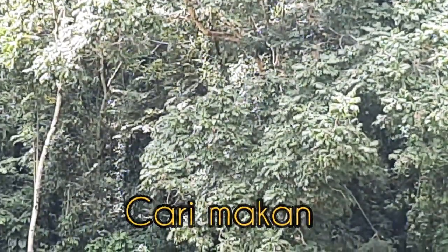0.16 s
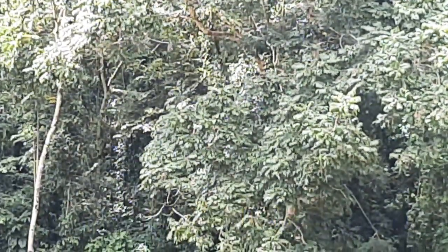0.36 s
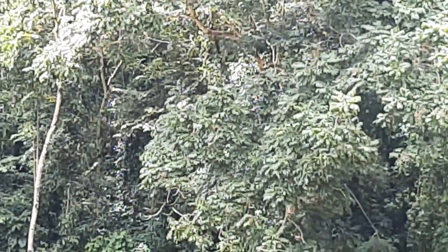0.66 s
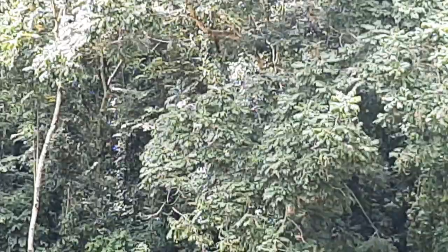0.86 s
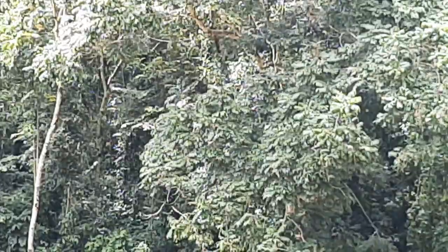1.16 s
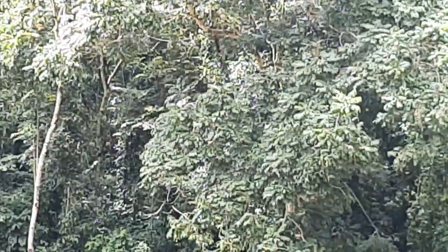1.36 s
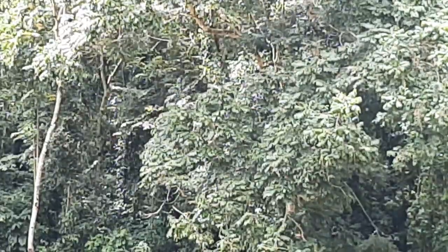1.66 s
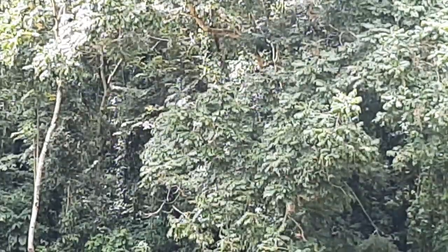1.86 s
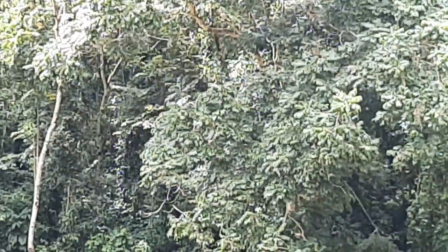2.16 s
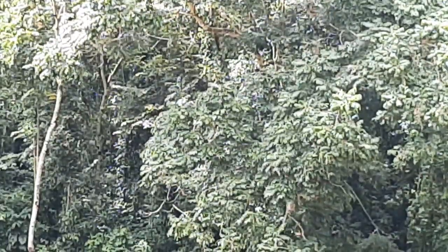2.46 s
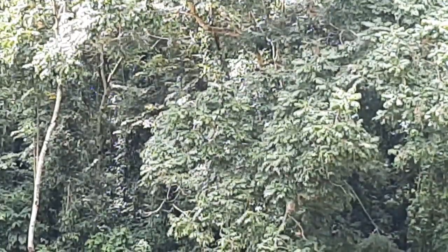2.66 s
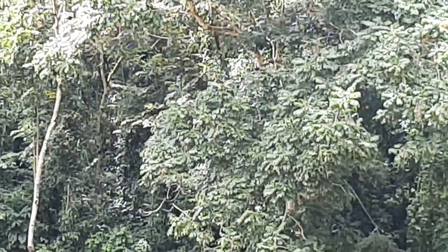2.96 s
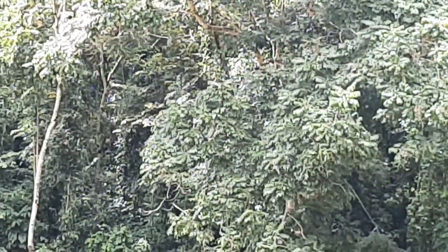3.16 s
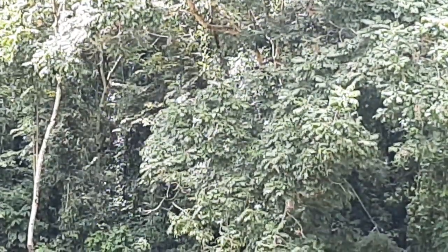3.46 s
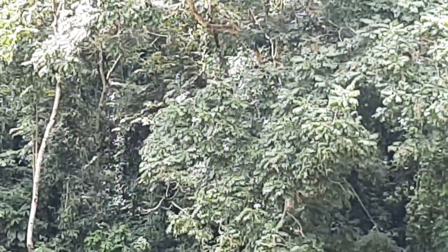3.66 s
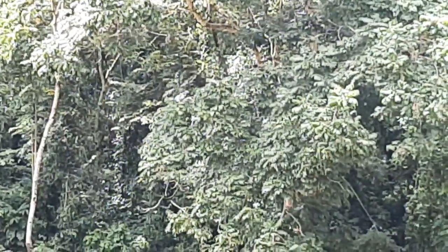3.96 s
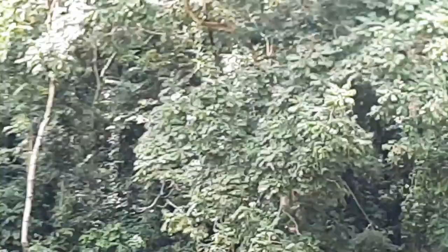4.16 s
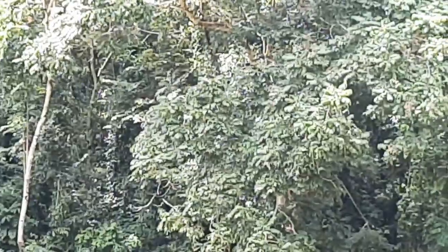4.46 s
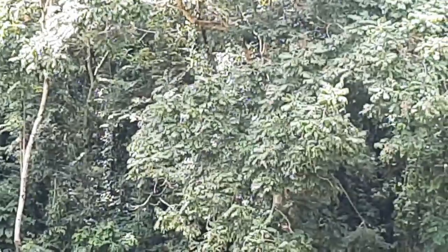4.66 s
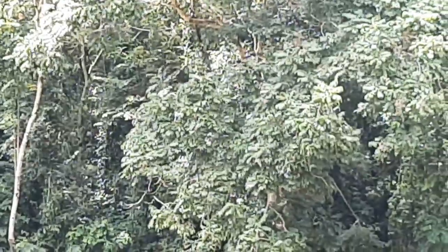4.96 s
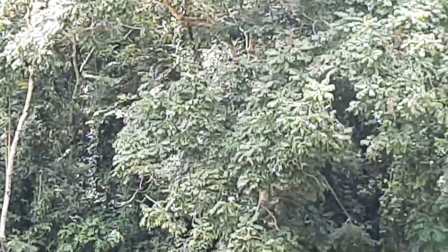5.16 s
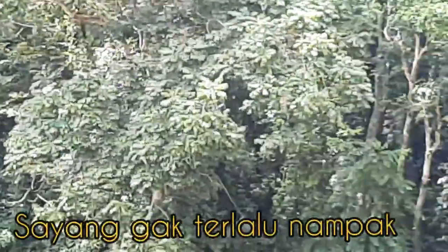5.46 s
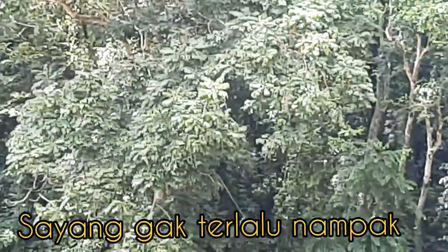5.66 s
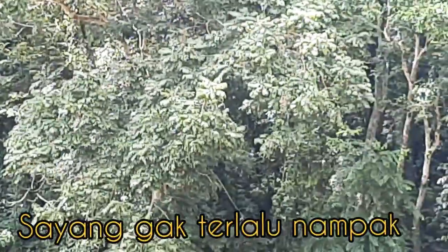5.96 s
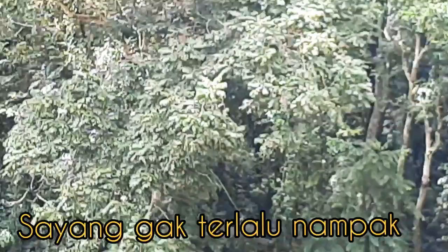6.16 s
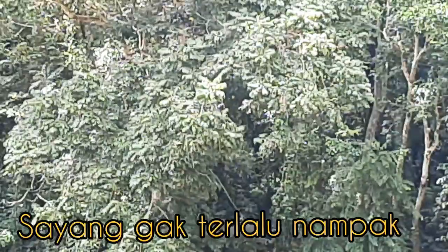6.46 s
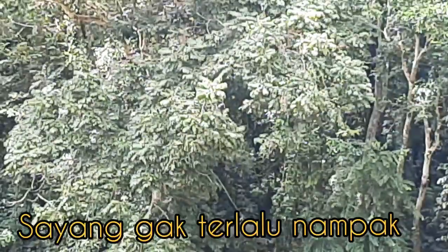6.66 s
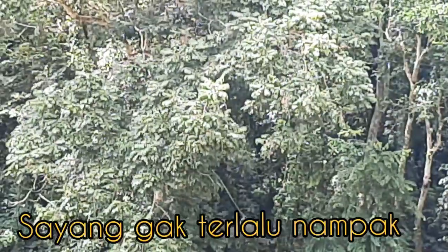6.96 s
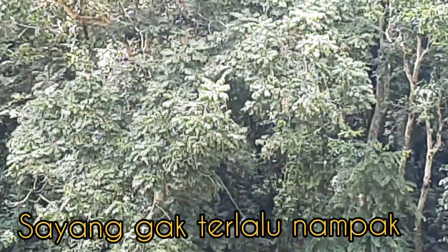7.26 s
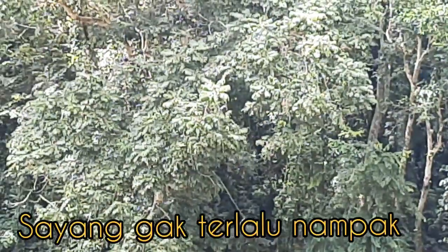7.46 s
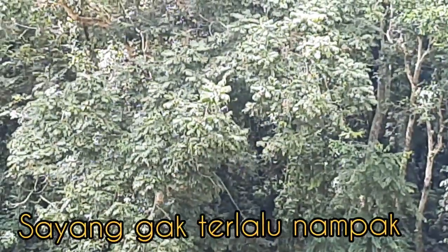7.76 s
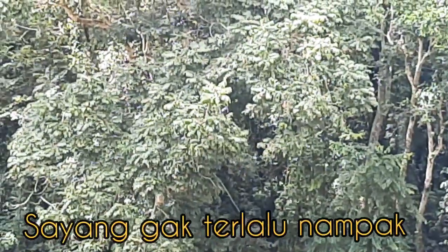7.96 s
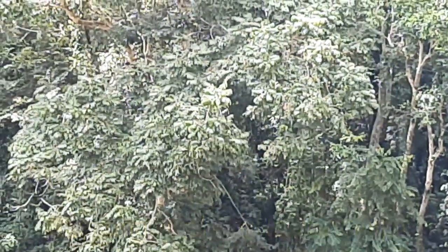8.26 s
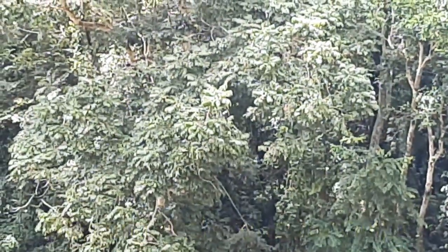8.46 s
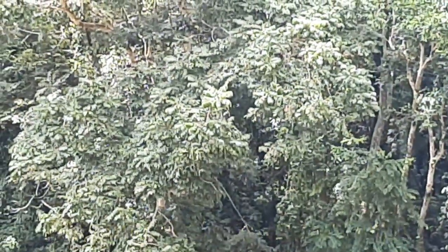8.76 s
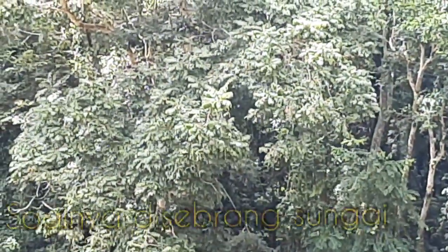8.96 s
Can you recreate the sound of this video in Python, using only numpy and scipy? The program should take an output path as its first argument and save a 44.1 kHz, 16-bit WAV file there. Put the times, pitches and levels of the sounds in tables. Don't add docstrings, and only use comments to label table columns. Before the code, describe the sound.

A far crowd of cicadas makes a continuous bright, shrill buzz in two high bands, with two nearer singers throbbing rapidly inside it. Much quieter below are a river's soft wash, leaf rustle, narrow cricket and frog notes and a barely audible low drone. Faint wooden bumps, taps and rubs come irregularly close to a hand-held stereo microphone, outdoors in open forest.

```python
import sys
import numpy as np
from scipy import signal
from scipy.fft import rfft, irfft, next_fast_len
from scipy.io import wavfile
from scipy.ndimage import uniform_filter1d

SR = 44100
rng = np.random.default_rng(int(sys.argv[2]) if len(sys.argv) > 2 else 0)


def makeup_ratio(level_db):
    decades = np.asarray(level_db, float) / 20
    return 10 ** decades


def to_wav(s):
    ch = np.atleast_2d(s).T
    pcm = np.round(np.clip(ch, -1, 1) * 32767)
    wavfile.write(sys.argv[1], SR, pcm.astype(np.int16))


N = 401310


def evened(x):
    return x / np.sqrt(np.mean(x ** 2) + 1e-20)


def read(points, hz):
    f, value = np.transpose(points)
    return np.interp(np.log(hz + 1), np.log(f + 1), value)


def curves(rows):
    s, *columns = np.transpose(rows)
    return [np.interp(np.arange(N) / SR, s, c) for c in columns]


def panned(x, db):
    return x * makeup_ratio(np.array([[db / 2], [-db / 2]]))


def wander(top_hz, count=24):
    t = np.arange(0, N + 256, 256) / SR
    hz = np.geomspace(.4, top_hz, count)[:, None]
    phase_turns = rng.random((count, 1))
    slow = (np.sin(2 * np.pi * (hz * t + phase_turns)) / hz ** 0.11).sum(0)
    return np.interp(np.arange(N) / SR, t, evened(slow - slow.mean()))


def resonate(x, hz, width_hz):
    r = np.exp(-np.pi * width_hz / SR)
    turn = np.exp(-2j * np.pi * (np.fft.rfftfreq(len(x)) - hz / SR))
    return irfft(rfft(x) * ((1 - r) / (1 - r * turn)) ** 2, len(x))


# pitch in Hz, width in Hz, level in dB rms.
DRONE_LINES = [(116.4, 10, -95), (145.2, 9.3, -93), (172.4, 15, -88.5), (372, 25, -86)]


def drone():
    length = next_fast_len(N)
    hz = np.fft.rfftfreq(length, 1 / SR)
    humps = 0
    for line_hz, width_hz, db in DRONE_LINES:
        humps = humps + makeup_ratio(db) / np.sqrt(width_hz) / (1 + (2 * (hz - line_hz) / width_hz) ** 2)
    shared, left, right = rng.standard_normal((3, length))
    air = rfft(np.array([.6 * shared + 0.53 * left, 0.51 * shared + right]))
    return np.sqrt(SR / 2) * irfft(air * humps, length)[:, :N]


# frequency in Hz, left-right level in dB.
PORT_STEP = [(40, 2), (140, -4), (330, -1.5), (500, -7.5), (1170, -4), (1790, -5), (2740, -7.5),
             (3400, -16.5), (4500, -7.5), (5600, -4.5), (6800, -6), (8000, -5), (9000, -3.2), (13500, -4.5)]
# frequency in Hz, shared share from 0 to 1.
PORT_LIKENESS = [(40, .1), (300, 0.54), (450, 0.3), (1000, 0.77), (1500, 0.24), (2400, 0.66), (3000, 0.32),
                 (4500, 0.041)]
LEFT_LAG_S = 0.0005
ECHO_DELAY_S, ECHO_SHARE = .00197, .17


def wash(spectrum, patchy_db, flicker_db):
    frames, hz = N // 256 + 5, np.fft.rfftfreq(1024, 1 / SR)
    a, b, c, d, chance = rng.standard_normal((frames, 513, 5)).T
    flicker = evened(uniform_filter1d(uniform_filter1d(chance, size=60, axis=0), size=3, axis=1))
    patches = evened(uniform_filter1d(uniform_filter1d(chance, size=7, axis=0), size=10, axis=1))
    same = np.clip(read(PORT_LIKENESS, hz), -1, 1)[:, None]
    late = np.exp(-2j * np.pi * hz * LEFT_LAG_S)[:, None]
    right = a + 1j * b
    left = same * late * right + np.sqrt(1 - same ** 2) * (c + 1j * d)
    left *= makeup_ratio(read(PORT_STEP, hz))[:, None]
    left *= abs(1 + ECHO_SHARE * np.exp(-2j * np.pi * hz * ECHO_DELAY_S))[:, None]
    level_db = read(spectrum, hz)[:, None] + patchy_db * patches + flicker_db * flicker
    z = np.array([left, right]) * makeup_ratio(level_db)
    return evened(signal.istft(z, nperseg=1024, noverlap=768)[1][:, :N])


# frequency in Hz, level in dB per Hz.
LEAF_SPECTRUM = [(1800, -30), (2800, 4), (3800, -3), (5500, -2), (9000, -6.5), (11500, -25)]


def leaves():
    rustle = wash([(1000, -80)] + LEAF_SPECTRUM + [(16000, -36)], patchy_db=1.1, flicker_db=2.8)
    return rustle * makeup_ratio(-67.5 + 1.5 * wander(top_hz=5.0))


# frequency in Hz, level in dB per Hz.
RIVER_SPECTRUM = [(25, -26), (58, -14), (200, -14), (410, -13), (520, -2), (1050, 1.5), (1400, -2),
                  (1900, -4), (2300, -3.5), (3200, -11.5), (4000, -17), (5400, -13), (9000, -15.5),
                  (10200, -28.5)]


def river():
    water = wash(RIVER_SPECTRUM + [(16000, -30)], patchy_db=1.35, flicker_db=.5)
    return water * makeup_ratio(-56 + 0.38 * wander(top_hz=8.0))


# pitch at left port in Hz, at right port in Hz, width in Hz, left-right level in dB, likeness.
CHOIR_NOTES = [
    (1502, 1545, 82, -6, 0.37),
    (4900, 4850, 360, -3, .05),
]
# level in dB rms, wander in dB, fastest wander in Hz.
CHOIR_EFFORTS = [
    (-67.8, 1.0, 12.0),
    (-67, 1.0, 4.0),
]


def choirs():
    out, lag = np.zeros((2, N)), round(LEFT_LAG_S * SR)
    for note, (db, wander_db, top_hz) in zip(CHOIR_NOTES, CHOIR_EFFORTS):
        left_hz, right_hz, width_hz, pan_db, same = note
        chirrups = rng.random((2, N)) < 1500 / SR
        right, other = rng.standard_normal((2, N)) * chirrups
        same = np.clip(same, 0, 1)
        left = same * np.roll(right, lag) + np.sqrt(1 - same ** 2) * other
        pair = np.array([resonate(left, left_hz, width_hz), resonate(right, right_hz, width_hz)])
        out += panned(evened(pair), pan_db) * makeup_ratio(db + wander_db * wander(top_hz))
    return out


def knock(db, hz, pan_db, width_share, length_s):
    t = np.arange(9000) / SR
    fall = np.exp(-(t / length_s) ** 2 * 1.9) + 0.35 * np.exp(-t / (2.1 * length_s))
    scrape = rng.standard_normal(len(t)) * np.minimum(t / 0.0046, 1) * fall
    scrape = signal.lfilter([1, -1], [1, -.985], scrape)
    ring = resonate(scrape, hz, width_share * hz)
    ring *= makeup_ratio(db) * np.sqrt(length_s * SR) / np.linalg.norm(ring)
    return panned(np.array([ring, np.roll(ring, 25)]), pan_db)


# start in seconds, level in dB rms, pitch in Hz, left-right level in dB.
WOOD_BUMPS = [(1.061, -64.5, 480, -11), (1.768, -69, 400, -5), (2.455, -60.5, 700, -4),
              (3.01, -58.5, 1290, -5), (3.875, -71.5, 300, 12), (4.187, -71, 300, 4.5),
              (5.435, -68.5, 300, 14), (5.436, -75, 110, 0), (5.617, -61.5, 600, 13), (7.895, -59, 850, 0),
              (7.949, -61, 560, 10), (8.49, -70, 440, 8), (8.555, -68, 520, 6)]
# start in seconds, level in dB rms, pitch in Hz, left-right level in dB.
PLANK_TAPS = [(.962, -71, 170, -7.5), (1.133, -68.5, 252, -7), (1.169, -67, 513, -2), (3.879, -69, 560, 8),
              (4.111, -67, 610, 15), (4.58, -66, 497, -13), (5.03, -72, 201, 2), (5.991, -72, 273, -7),
              (7.96, -82, 165, 11), (8.1, -68, 520, 5), (8.49, -79, 150, 5), (8.561, -81, 150, 3),
              (8.839, -67, 600, 4)]
# start in seconds, level in dB rms, pitch in Hz, left-right level in dB.
HOLLOW_RUBS = [
    (4.115, -67, 372, 8),
    (5.05, -82, 55, -3),
    (5.461, -70.5, 385, 12),
    (7.91, -74.5, 400, 16),
]


def knocks():
    out = np.zeros((2, N))
    kinds = ((WOOD_BUMPS, 0.64, 0.035), (PLANK_TAPS, 0.26, .038), (HOLLOW_RUBS, 0.14, 0.088))
    for rows, width_share, length_s in kinds:
        for start_s, db, hz, pan_db in rows:
            out[:, round(start_s * SR):][:, :9000] += knock(db, hz, pan_db, width_share, length_s)
    return out


def trees(t60_s, direct):
    at = np.arange(20, SR // 3, 20)
    taps = np.zeros(SR // 3 + 20)
    fall = makeup_ratio(-60 * at / SR / t60_s)
    taps[at + rng.integers(0, 20, len(at))] = rng.choice([-1., 1.], len(at)) * fall
    taps /= np.linalg.norm(taps)
    taps[0] = direct
    return taps


def throb_clicks(turns, spacing_turns, fade_db, jitter_s, count=4):
    out = np.zeros(N)
    for k in range(count):
        at = np.flatnonzero(np.diff(np.floor(turns - k * spacing_turns)) > 0)
        shift, sign = rng.standard_normal((200, 2))[:len(at)].T
        at = np.clip(at + (jitter_s * SR * shift).astype(int), 0, N - 1)
        np.add.at(out, at, np.sign(sign) * makeup_ratio(-fade_db * k))
    return out


# drum in Hz, overtone in Hz, width in Hz, drum in dB rms, overtone in dB rms, left-right in dB.
NEAR_SINGERS = [
    (7550, 15100, 500, -60, -61, -6),
    (6450, 12900, 500, -60, -62, -1),
]
# time in seconds, throbs per second of first singer, of second, effort of the first in dB.
NEAR_THROBS = [
    (0, 17.75, 17.45, -1),
    (1, 17.8, 17.35, 1),
    (2, 17.82, 17.3, -2),
    (3.5, 17.82, 17.3, 2),
    (4.5, 17.75, 17.25, -1),
    (5.7, 17.5, 17.2, 0),
    (6.5, 17.35, 17.2, -2),
    (9.1, 17.45, 17.25, -3),
]


def singers():
    out = np.zeros((2, N))
    *rates, first_effort_db = curves(NEAR_THROBS)
    for singer, rate, effort_db in zip(NEAR_SINGERS, rates, (first_effort_db, 0)):
        drum_hz, overtone_hz, width_hz, drum_db, overtone_db, pan_db = singer
        turns = np.cumsum(rate) / SR
        clicks = throb_clicks(turns, spacing_turns=.213, fade_db=2.5, jitter_s=.0009)
        song = makeup_ratio(drum_db) * evened(resonate(clicks, drum_hz, width_hz))
        song += makeup_ratio(overtone_db) * evened(resonate(clicks, overtone_hz, 1.2 * width_hz))
        heard = [signal.oaconvolve(song, trees(t60_s=.12, direct=1.2))[:N] / 1.55 for _ in out]
        out += panned(np.array(heard), pan_db) * makeup_ratio(effort_db)
    return out


# frequency in Hz, level in dB per Hz.
DRUM_SPECTRUM = [(4500, -50), (5300, -33), (5700, -18), (6200, -7.5), (6500, -0.5), (6800, 2), (7200, 0),
                 (7600, -2), (7900, -10), (8300, -19.5), (8700, -41), (9200, -29), (10000, -44.5),
                 (12000, -80)]
# frequency in Hz, level in dB per Hz.
OVERTONE_SPECTRUM = [(8000, -60), (10000, -38), (10600, -26.5), (11500, -22), (12000, -12), (12700, -4.5),
                     (13300, 3), (14000, 0.5), (14700, 2.5), (15200, -5), (15500, -10), (16000, -14)]


def crowd(count=8, size=20):
    length = next_fast_len(N)
    heard = np.zeros((2, length // 2 + 1), complex)
    for k in range(2 * count):
        rate, start = rng.random((size, 2, 1)).transpose(1, 0, 2)
        throbs_s = (np.arange(170) + start) / (16.9 + 1.1 * rate)
        jitter_s = .0006 * rng.standard_normal((size, 170, 4))
        at = throbs_s[..., None] + np.arange(4) * .0121 + jitter_s
        sign = rng.choice([-1., 1.], at.shape) * (at < length / SR)
        clicks = np.bincount((at.ravel() * SR).astype(int) % length, sign.ravel(), length)
        heard[k % 2] += rfft(clicks) * rfft(trees(t60_s=.28, direct=.4), length)
    hz = np.fft.rfftfreq(length, 1 / SR)
    heard *= makeup_ratio(read(PORT_STEP, hz) * np.array([[.5], [-.5]]))
    drum = evened(irfft(heard * makeup_ratio(read(DRUM_SPECTRUM, hz)), length)[:, :N])
    overtone = evened(irfft(heard * makeup_ratio(read(OVERTONE_SPECTRUM, hz)), length)[:, :N])
    effort_db = 0.18 * wander(top_hz=1.49)
    return makeup_ratio(effort_db) * (makeup_ratio(-39.5) * drum + makeup_ratio(-47) * overtone)


def scene():
    return drone() + leaves() + river() + choirs() + knocks() + singers() + crowd()


def low_pass(x):
    return signal.sosfilt(signal.butter(12, 15830, fs=SR, output="sos"), x)


def record(dry):
    cut = signal.butter(2, 45, "high", fs=SR, output="sos")
    return low_pass(signal.sosfilt(cut, dry))


dry = scene()
out = record(dry)
to_wav(out)
```